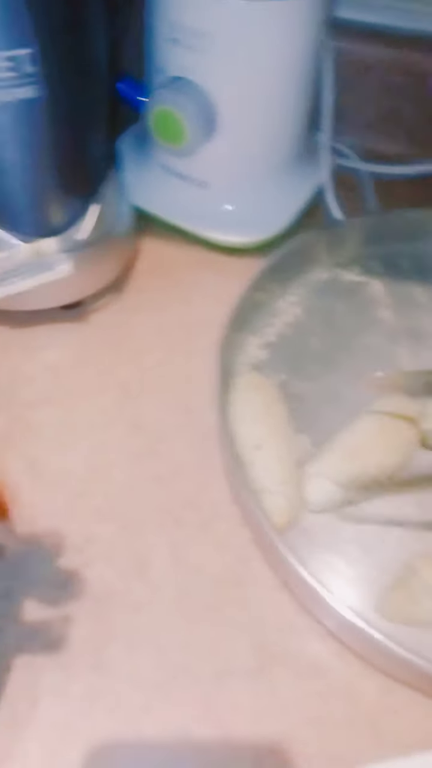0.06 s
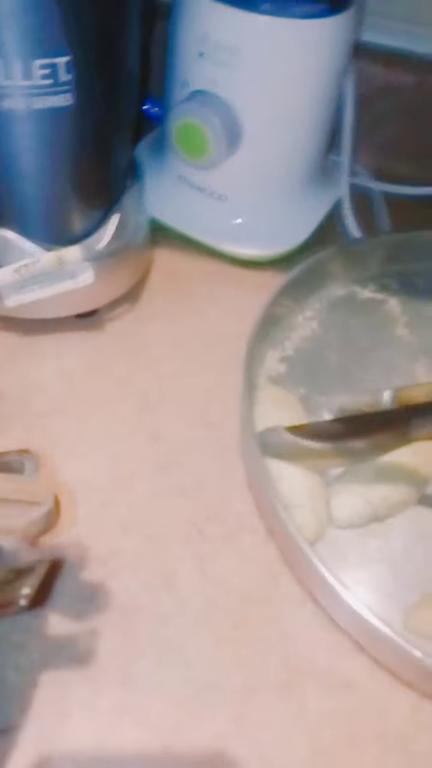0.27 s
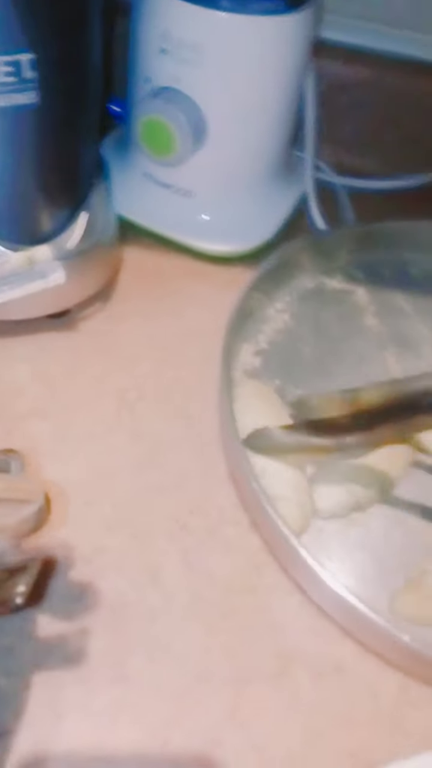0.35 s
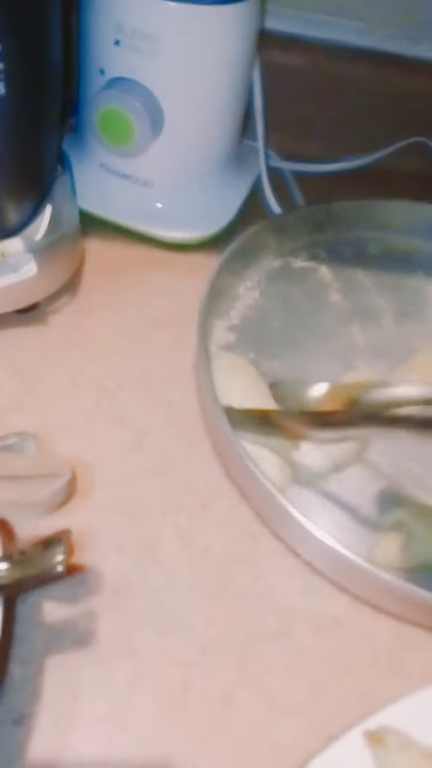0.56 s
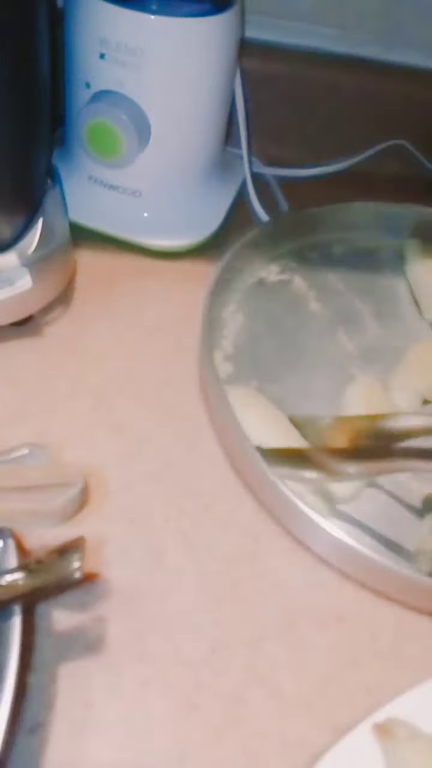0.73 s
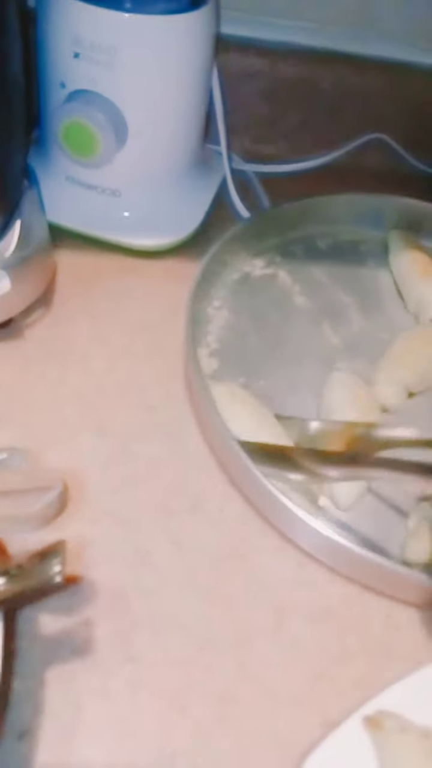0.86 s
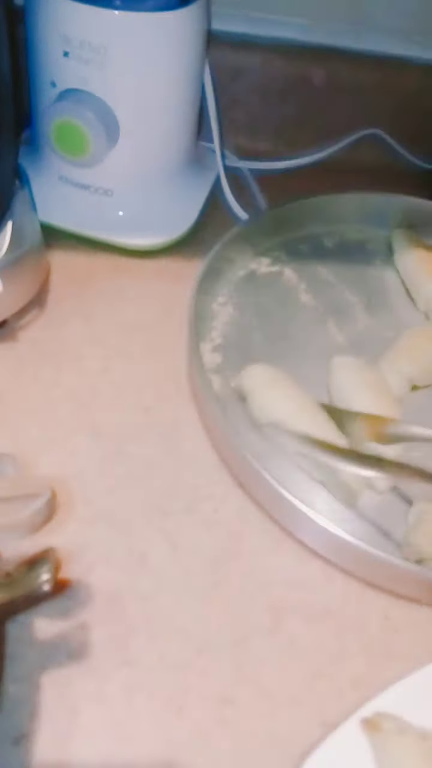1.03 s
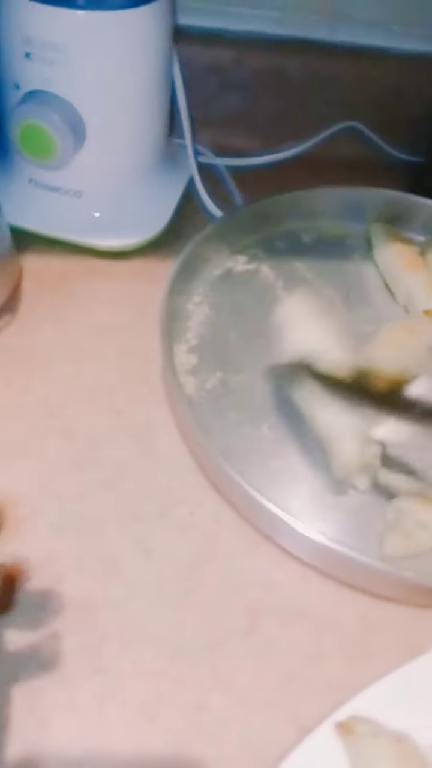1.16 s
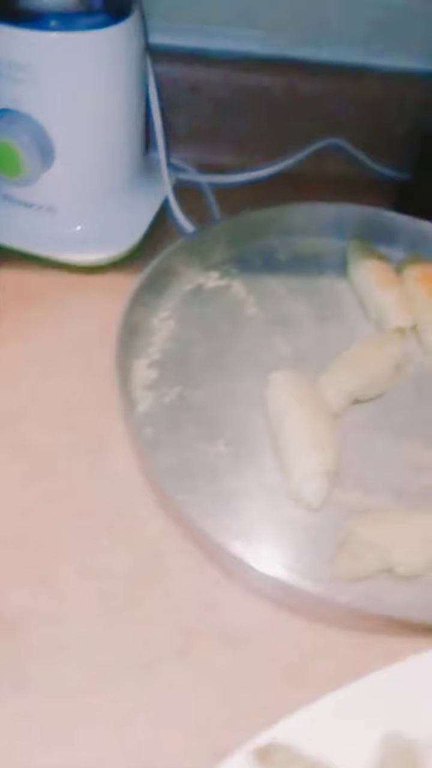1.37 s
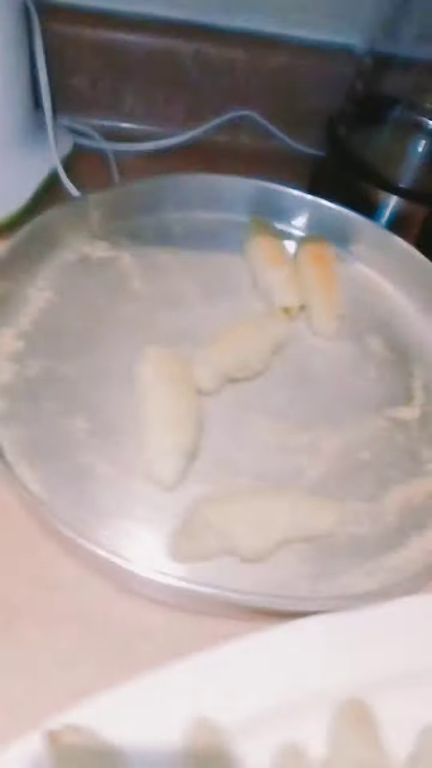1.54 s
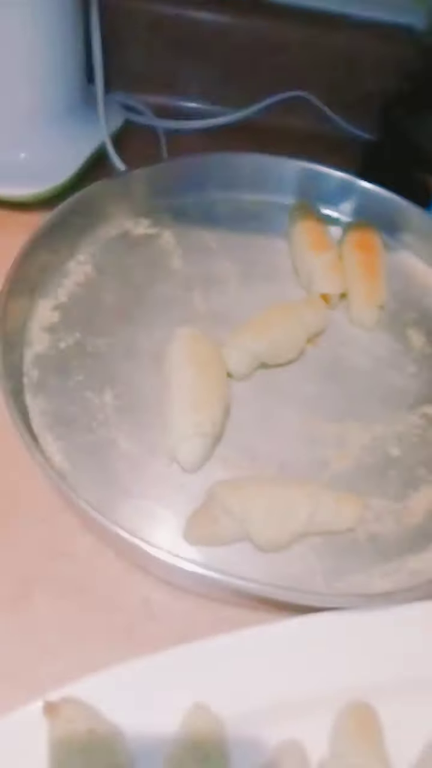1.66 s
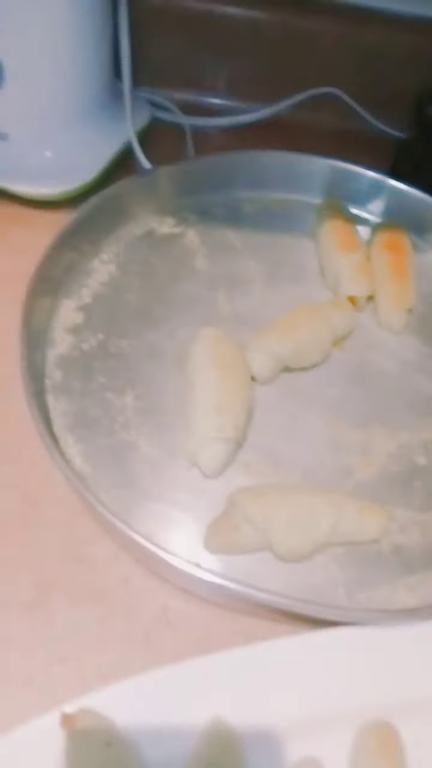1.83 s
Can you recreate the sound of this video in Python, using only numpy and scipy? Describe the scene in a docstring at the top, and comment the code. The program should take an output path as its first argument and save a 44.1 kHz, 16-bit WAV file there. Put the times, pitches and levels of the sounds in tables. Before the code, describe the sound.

Steel tongs clack sharply against a thin metal tray, with short gritty scrapes between contacts

```python
"""In a small kitchen, steel tongs click against an aluminium baking tray and scrape over it as rolls are lifted off.
Each contact rings the tongs and the tray as sums of wavering tones, with a short crack of coloured noise.
The slides between are grainy noise, crust brushes the metal with a bright rustle, and the tray gives soft
low thuds. A short room tail answers, over soft room noise, rumble, a low wavering hum and a late drone."""
import sys
import numpy as np
from scipy import signal
from scipy.fft import rfft, irfft, next_fast_len
from scipy.io import wavfile
from scipy.ndimage import map_coordinates

SR = 44100
rng = np.random.default_rng(int(sys.argv[2]) if len(sys.argv) > 2 else 0)


def persist_wave(psi):
    """Save psi, clipped to +-1, as 16-bit WAV."""
    counts = np.round(np.clip(psi, -1, 1) * 32767).astype(np.int16)
    wavfile.write(sys.argv[1], SR, np.atleast_2d(counts).T)


N = 83790
T = np.arange(N) / SR  # time in seconds
PIVOT_HZ = 3000  # pitch at which a brightness tilt changes nothing


def amp(db):
    """Turn decibels into a gain."""
    return 10 ** (np.asarray(db) / 20)


def unit(x):
    """Scale a signal to an rms of 1."""
    return x / np.sqrt(np.mean(x ** 2) + 1e-20)


def along(points, hz):
    """Read a curve of (Hz, value) points on a log pitch axis."""
    point_hz, values = np.transpose(points)
    return np.interp(np.log(hz + 1), np.log(point_hz + 1), values)


def wobble(rate):
    """A smooth random curve with `rate` random knots a second."""
    return map_coordinates(rng.standard_normal(4096), [T * rate], mode="wrap")


def flutter(t, rate):
    """Random values joined by straight lines along t, `rate` knots a second."""
    knots = rng.standard_normal(size=512)
    return np.interp((t - t[0]) * rate, np.arange(len(knots)), knots)


def filtered(x, response):
    """Multiply the spectrum of x by a gain that depends on frequency."""
    size = next_fast_len(N + 8192)  # spare room at the end for what the filter spreads out
    spectrum = rfft(x, size) * response(np.fft.rfftfreq(size, 1 / SR))
    return irfft(spectrum, size)[:N]


def octaves(hz):
    """Octaves above the pivot, held from a tenth of its pitch down and from twice its pitch up."""
    return np.log2(np.clip(hz / PIVOT_HZ, 1 / 10, 2))


def noise(spectrum, tilt_db=0):
    """Coloured noise of rms 1; the tilt is in dB per octave."""
    def colour(hz):
        return amp(along(spectrum, hz) + tilt_db * octaves(hz))
    return unit(filtered(rng.standard_normal(N), colour))


def swell(s, rise, fall):
    """A soft envelope that peaks at s; rise and fall are the times to about a third of the peak."""
    return np.exp(-np.abs((T - s) / np.where(T < s, rise, fall)) ** 1.3)


def strike(t, rise, t60):
    """Pressure builds up to t = 0, then the sound fades by 60 dB in t60 seconds."""
    build = np.clip(1 + t / rise, 0, 1) ** 1.4
    return build * amp(-60 * np.maximum(t, 0) / t60)


# Colour of the room noise. Each row: pitch in Hz, relative level in dB.
FLOOR = [(20, -30), (55, -15.5), (110, -27.5), (200, -8), (270, -10.5), (335, 7), (400, -3), (465, -3),
         (520, 3.5), (590, -7), (720, -15.5), (810, -9.5), (950, -15), (1200, -26.5), (2500, -30),
         (5000, -32), (8000, -44), (13500, -46.5), (15500, -40.5)]
FLOOR_DB, FLOOR_SWING_DB, FLOOR_SWING_PER_S = -57, 1.9, 14  # middle level, swing, knots a second


def room_noise():
    """Soft coloured noise whose level wavers a little."""
    level_db = FLOOR_DB + FLOOR_SWING_DB * wobble(FLOOR_SWING_PER_S)
    return amp(level_db) * noise(FLOOR)


# Colour of the rumble. Each row: pitch in Hz, relative level in dB.
RUMBLE = [(20, -15), (55, 1.5), (110, -4.5), (220, -21.5), (500, -54)]
RUMBLE_DB, RUMBLE_SWING_DB, RUMBLE_PER_S = -71.5, 4, 22  # middle level, swing, knots a second


def rumble():
    """Low noise with an uneven level."""
    level_db = RUMBLE_DB + RUMBLE_SWING_DB * wobble(RUMBLE_PER_S)
    return amp(level_db) * noise(RUMBLE)


# Tones of the hum. Each row: pitch in Hz, rms level in dB.
HUM = [(518, -60.5), (810, -72.5)]
HUM_DRIFT_RAD, HUM_DRIFT_PER_S = 0.86, 16  # size of the phase drift, knots a second


def hum():
    """Sine tones that waver because their phase drifts."""
    out = np.zeros(N)
    for hz, db in HUM:
        drift = HUM_DRIFT_RAD * wobble(HUM_DRIFT_PER_S)
        out += amp(db) * np.sqrt(2) * np.sin(2 * np.pi * hz * T + drift)
    return out


# Colour of the low drone. Each row: pitch in Hz, relative level in dB.
DRONE = [(200, -45), (310, -8), (400, 0.5), (450, -1.5), (600, -61)]
DRONE_DB, DRONE_START_S, DRONE_RISE_S = -58, 1.58, 0.027


def drone():
    """A narrow low noise that fades in near the end and then holds."""
    fade_in = np.clip((T - DRONE_START_S) / DRONE_RISE_S, 0, 1)
    return amp(DRONE_DB) * noise(DRONE) * fade_in


# How long the kitchen echoes. Each row: pitch in Hz, seconds to fade by 60 dB.
ROOM = [(150, .25), (1500, 0.24), (5500, 0.23), (9000, 0.13), (15000, 0.1)]
ROOM_DB, ROOM_RISE_S = -13, .006  # level of the tail, time it takes to build up


def kitchen(x):
    """Blur a sound with a short tail of fading noise whose treble dies first."""
    hz, t, grid = signal.stft(rng.standard_normal(SR // 2), SR, nperseg=256)
    fade = amp(-60 * t / along(ROOM, hz)[:, None])
    tail = signal.istft(grid * fade, SR)[1]
    tail *= np.minimum(T[:len(tail)] / ROOM_RISE_S, 1)
    return signal.fftconvolve(x, tail / np.linalg.norm(tail))[:N]


# Soft bumps of the tray on the counter. Each row: peak in seconds, level in dB, rise and fall in seconds.
BUMPS = [(0.276, -49, 0.046, 0.029), (.395, -60.5, 0.016, 0.03), (.49, -52.5, 0.03, 0.054),
         (.805, -54, 0.0064, 0.033), (.9, -59.5, 0.063, 0.053), (1.155, -62.5, 0.031, .04),
         (1.82, -67.5, .07, 0.046)]
# Colour of a bump. Each row: pitch in Hz, relative level in dB.
BUMP = [(25, -13.5), (60, -1), (150, -4.5), (215, -3), (290, -10.5), (600, -40.5)]


def bumps():
    """The pushed tray thuds softly on the counter: swells of low noise."""
    level = sum(amp(db) * swell(s, rise, fall) for s, db, rise, fall in BUMPS)
    return noise(BUMP) * level


THUMP_S, THUMP_HZ, THUMP_DB = .472, 168, -31.5  # end of the build-up, pitch, level
THUMP_RISE_S, THUMP_T60_S = .01, .11


def thump():
    """The hardest contact flexes the bottom of the tray, which gives one low, short note."""
    t = T - THUMP_S
    return amp(THUMP_DB) * np.sin(2 * np.pi * THUMP_HZ * t) * strike(t, THUMP_RISE_S, THUMP_T60_S)


SING_DB, SING_WIDTH_HZ = 2.5, 43.8  # height of the metal's peaks, half width of each


def metal(hz):
    """Friction brings out the natural tones of tray and tongs, so the gain peaks at each."""
    peaks = np.max([1 / (1 + ((hz - f) / SING_WIDTH_HZ) ** 2) for f, db, t60 in TRAY + TONGS], axis=0)
    return amp(SING_DB * (peaks - .5))


# Light brushes of dry crust. Each row: peak in seconds, level in dB before the metal colours it,
# rise and fall in seconds.
BRUSHES = [(0.169, -54, 0.0062, 0.0083), (.617, -53.5, 0.012, 0.015), (1.625, -61.5, .006, .01),
           (1.645, -54, .009, 0.007), (1.687, -62.5, .006, 0.012), (1.816, -67, 0.0085, .01)]
# Colour of the crust. Each row: pitch in Hz, relative level in dB.
CRUST = [(500, -8), (1500, -7.5), (2400, -3.5), (3100, 1.5), (4300, -6), (5400, 6), (6700, -2.5),
         (8000, -12), (10500, -7), (12000, -11.5), (13700, -26), (15200, -4), (16000, -11.5)]


def brushes():
    """Dry crust brushes the metal with a thin, bright rustle."""
    level = sum(amp(db) * swell(s, rise, fall) for s, db, rise, fall in BRUSHES)
    return filtered(noise(CRUST) * level, metal)


# Slides of tongs and rolls on the tray. Each row: peak in seconds, level in dB before grain and metal,
# rise and fall in seconds, brightness in dB per octave.
SLIDES = [(.228, -38, 0.0055, .01, 0.5), (.357, -48, 0.016, .025, -3), (.445, -57.5, .012, .008, 4),
          (.58, -53.5, 0.06, .03, -4.5), (0.684, -44.5, 0.0054, 0.0184, 1.5),
          (.72, -46.5, 0.034, 0.037, -4.5), (.756, -52, 0.0044, 0.021, 3.5), (.825, -55, 0.027, .04, -1),
          (.872, -48, 0.024, .02, 1.5), (.922, -49, 0.024, 0.024, -6), (.962, -43.5, .009, 0.026, 5.5),
          (1.024, -39, 0.021, .026, 4.1), (1.052, -45, .012, 0.023, 1), (1.113, -58.5, 0.0069, 0.0092, -2),
          (1.755, -72, .025, .03, 0)]
# Colour of the scrape. Each row: pitch in Hz, relative level in dB.
SCRAPE = [(150, -23.5), (700, -1), (1050, -9.5), (1400, -0.5), (2100, -3), (2900, 4.5), (4000, -1.5),
          (5500, -1), (6700, -3), (7800, -13.5), (10000, -18.5), (13500, -26.5), (15200, -8), (16000, -19)]
SLIP_DB, SLIPS_PER_S = 1, 890  # grain of the friction: swing, knots a second


def slides():
    """Short strokes of noise, made grainy by sticking and slipping and coloured by the metal."""
    strokes = np.zeros(N)
    for s, db, rise, fall, tilt_db in SLIDES:
        strokes += amp(db) * swell(s, rise, fall) * noise(SCRAPE, tilt_db)
    grain = unit(amp(SLIP_DB * wobble(SLIPS_PER_S)))
    return filtered(strokes * grain, metal)


WAVER_RAD, WAVER_PER_S = 0.56, 200  # rattle: phase waver at the pivot pitch, knots a second
AFTER_DB, AFTER_T60_S = -33.5, .3  # weak ring that outlasts the contact
AFTER_BLUR = 0.022  # width of the after-ring as a share of its pitch
FAVOUR_DB, FAVOUR_OCTAVES = 9.5, .1  # lift near the favoured pitch for an instant contact, its reach
FAVOUR_FADE_S = 0.007  # a slow, grinding contact favours that pitch less


def ring(modes, t, rise, damping, tilt_db, favoured_hz):
    """Rattling tones: a fast decay while the parts touch, and a weak, blurred after-ring."""
    hz, db, t60 = np.transpose(modes)
    distance = np.log2(hz / favoured_hz) / FAVOUR_OCTAVES
    favour = FAVOUR_DB * np.exp(-rise / FAVOUR_FADE_S - distance ** 2)
    chance_db = rng.normal(0, 0.68, len(hz))  # the balance of the tones varies from contact to contact
    gains = amp(db + favour + tilt_db * octaves(hz) + chance_db)
    gains /= np.linalg.norm(gains)
    after = amp(AFTER_DB) * strike(t, rise, AFTER_T60_S)
    out = np.zeros(len(t))
    for f, gain, life in zip(hz, gains, t60 / damping):
        phase = 2 * np.pi * (f * t + rng.random())
        waver = WAVER_RAD * np.sqrt(f / PIVOT_HZ) * flutter(t, WAVER_PER_S)
        rattling = np.sin(phase + waver)
        knots_per_s = 2 * AFTER_BLUR * f
        blurred = flutter(t, knots_per_s) * np.sin(phase) + flutter(t, knots_per_s) * np.cos(phase)
        out += gain * (rattling * strike(t, rise, life) + blurred * after)
    return np.sqrt(2) * out


# Contacts of tongs and tray. Each row: peak in seconds, tongs ring in dB, tray ring in dB, crack in dB,
# build-up in seconds, seconds for the crack to fade by 60 dB, brightness in dB per octave,
# pitch favoured at the point of contact in Hz.
CONTACTS = [(0.2323, -27.5, -37, -28.5, 0.0023, 0.021, 1, 6300),
            (0.2563, -30, -33.5, -22.5, 0.0028, 0.03, -0.5, 6350),
            (0.2636, -37, -43.5, -29.5, 0.0033, 0.02, -1.5, 1360),
            (.4700, -19.5, -41.5, -28, 0.02, 0.032, 0.9, 5400),
            (0.4734, -50.5, -49, -19, 0.0037, .025, 2, 6400),
            (0.7905, -32, -64, -31, 0.00064, .026, 1.3, 5300),
            (.725, -50.5, -41.5, -53.5, 0.0094, .04, -3, 1720),
            (.887, -48, -35.5, -30, 0.0079, 0.022, -3, 1070),
            (.896, -70, -27, -29.5, 0.0093, 0.027, -3, 3400),
            (1.647, -61.5, -83, -81, 0.0096, 0.039, 6, 5500), (1.685, -68, -72, -72, .004, 0.036, 1, 5500)]
# Natural tones of the tongs. Each row: pitch in Hz, relative level in dB,
# seconds to fade by 60 dB when the crack lasts GRIP_T60_S.
TONGS = [(457, -6, .13), (800, -3.5, .06), (1330, -2, .05), (1385, -3, .06), (1701, -13, .1),
         (2780, -2.5, .065), (3372, -14, .08), (4052, 1, .04), (4760, -7.5, .045), (5426, -1, .05),
         (5507, -4.5, .09), (5690, -8.5, .08), (6211, -3, .05), (6320, -7, .04), (6665, -10, .045)]
# Natural tones of the tray, damped by the counter. Each row is laid out as for the tongs.
TRAY = [(450, -14, 0.16), (680, -8.5, .05), (884, -7, .04), (1051, -8.5, .04), (1440, -2, .04),
        (1680, -2, .045), (1770, -6.5, .06), (2290, -10, .05), (2430, -7, .04), (2840, -3.5, .05),
        (3352, 3, .05), (4510, 1, .05), (5780, -3.5, .04), (6590, -5.5, .05)]
# Colour of the crack. Each row: pitch in Hz, relative level in dB.
CRACK = [(100, -15), (500, -15.5), (1000, -7.5), (1400, 5), (2000, -7), (2750, 1.5), (3150, -4.5),
         (3500, -2), (5000, -3), (5600, 2), (6300, 2), (7200, -7), (10000, -17.5), (13800, -18),
         (15000, -8.5), (16000, -24.5)]
GRIP_T60_S = 0.027  # a longer crack lets the tones ring longer, a shorter one cuts them


def contacts():
    """The tongs meet the tray: both ring, and the contact cracks."""
    out = np.zeros(N)
    for s, tongs_db, tray_db, crack_db, rise, t60, tilt_db, favoured_hz in CONTACTS:
        near = slice(int(s * SR) - SR // 20, int(s * SR) + SR // 2)
        t, damping = T[near] - s, GRIP_T60_S / t60
        out[near] += amp(tongs_db) * ring(TONGS, t, rise, damping, tilt_db, favoured_hz)
        out[near] += amp(tray_db) * ring(TRAY, t, rise, damping, tilt_db, favoured_hz)
        out += amp(crack_db) * noise(CRACK, tilt_db) * strike(T - s, rise, t60)
    return out


def scene():
    """Tongs, tray and rolls with their room tail, over the background."""
    handling = contacts() + thump() + slides() + brushes() + bumps()
    answer = amp(ROOM_DB) * kitchen(handling)
    background = hum() + drone() + rumble() + room_noise()
    return (handling + answer + background)[None]


TOP_HZ = 16100  # band limit


def record(dry):
    """Keep nothing above the band limit."""
    return filtered(dry[0], lambda hz: hz < TOP_HZ)[None]


dry = scene()
out = record(dry)
persist_wave(out)
```